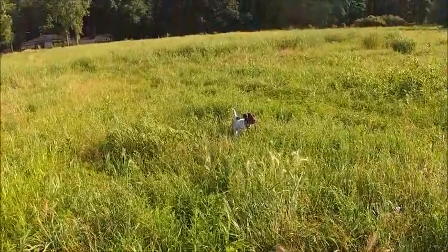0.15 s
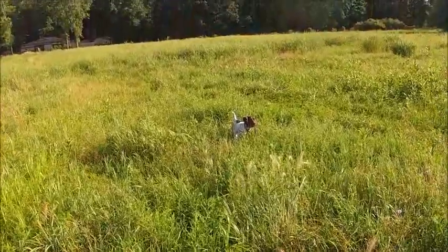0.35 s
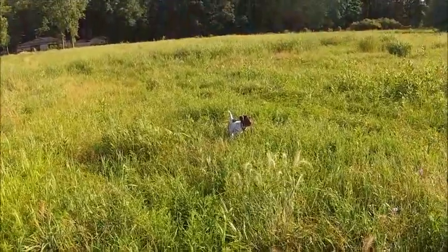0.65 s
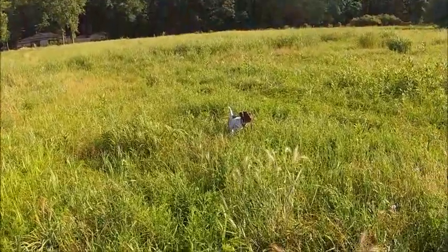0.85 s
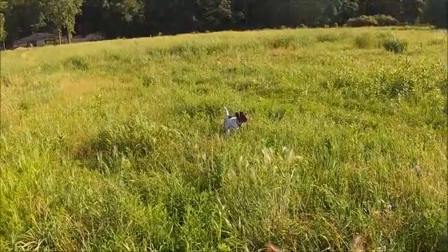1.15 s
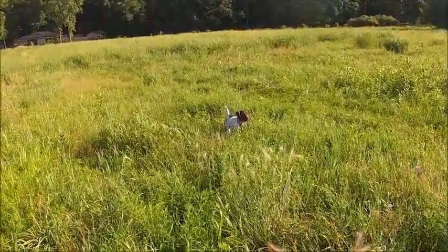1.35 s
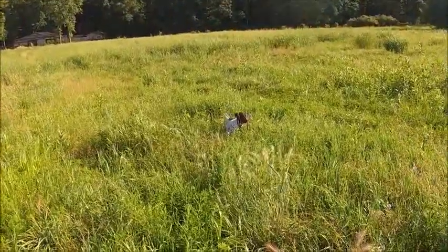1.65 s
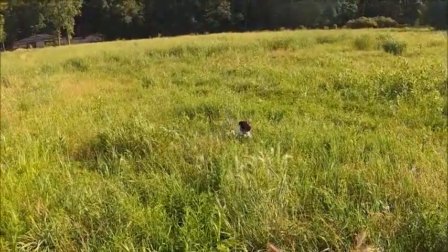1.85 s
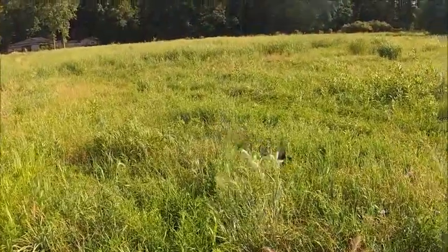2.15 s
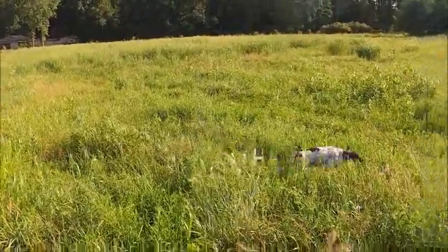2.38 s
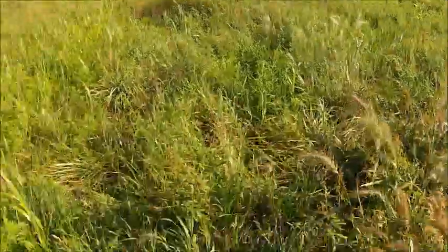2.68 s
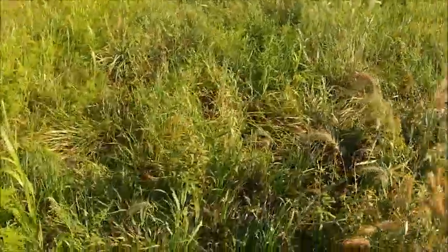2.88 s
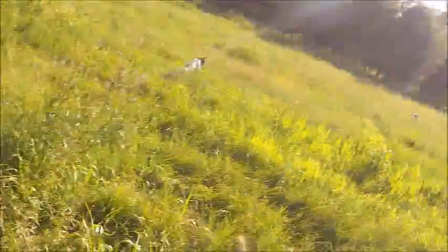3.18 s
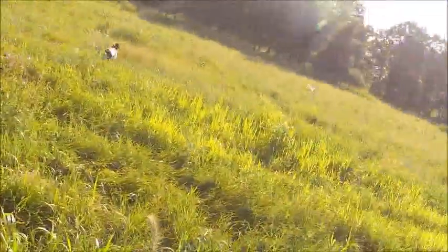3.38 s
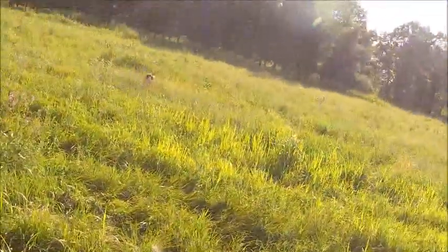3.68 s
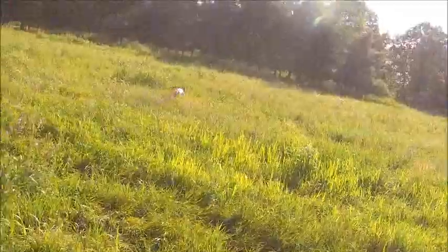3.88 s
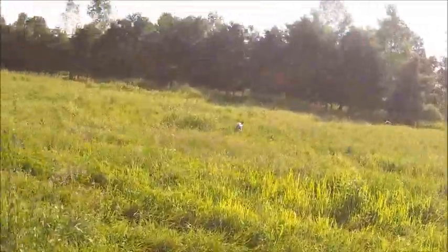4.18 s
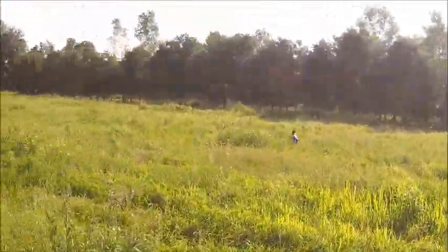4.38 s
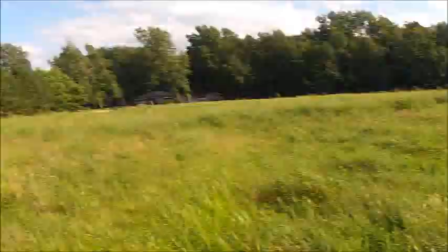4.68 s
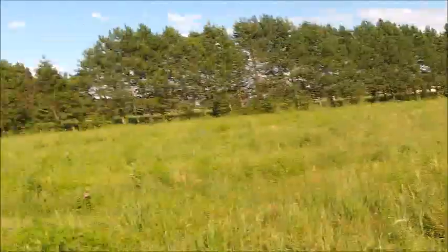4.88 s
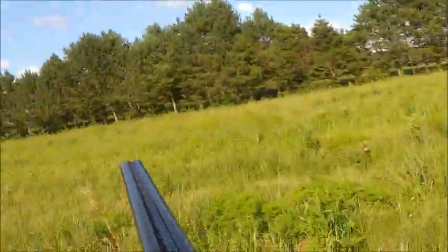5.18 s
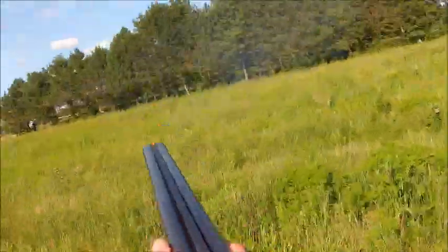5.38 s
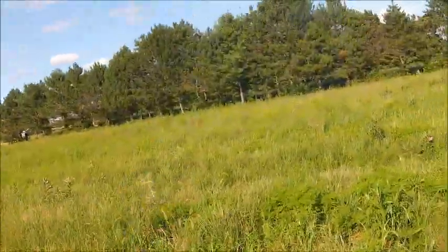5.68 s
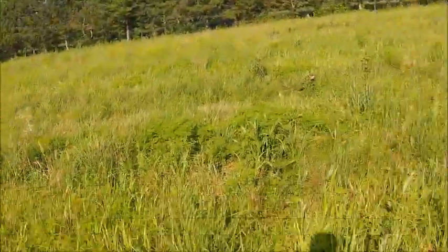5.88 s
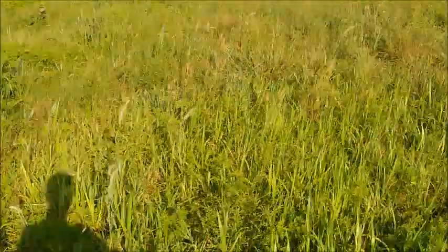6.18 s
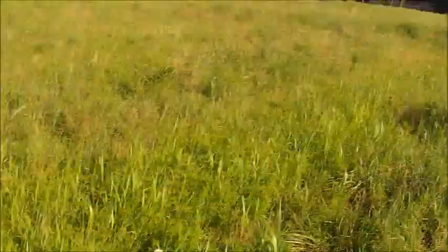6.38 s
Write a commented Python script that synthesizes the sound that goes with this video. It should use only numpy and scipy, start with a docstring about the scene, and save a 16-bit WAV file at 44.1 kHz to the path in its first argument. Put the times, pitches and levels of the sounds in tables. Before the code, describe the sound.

Heard from a hunter's head outdoors: soft air and faint insect flutter, a tiny falling whistle, then brisk rustling, small creaks and brittle cracks through tall grass. Low wind gusts rumble on the microphone while gear pings and steel clicks. A single violent gunshot distorts, answered at once by strong tree-line echoes and a duller rolling tail, with a couple of small clicks afterward.

```python
"""An insect buzzes over an open field, then grass swishes, squeaks and snaps as a hunter walks through.
Wind buffets the head-worn recorder as the hunter turns; a raised shotgun clicks, fires once and the shot rolls
back from the trees. Filtered noise makes air, wind, footfall rumble, blast and returns, random grains and
impulses make the grass, snaps and clicks, and swept sines make insect, whistle, squeaks and pings.
The recorder clips its input, samples slowly and holds each value, which mirrors the sound into a gritty treble."""
import sys
import numpy as np
from scipy import signal
from scipy.fft import rfft, irfft, next_fast_len
from scipy.io import wavfile
from scipy.ndimage import uniform_filter1d

SR = 44100
rng = np.random.default_rng(int(sys.argv[2]) if len(sys.argv) > 2 else 0)


def dump(signal):
    """Clip the signal to [-1, 1] and save it as 16-bit WAV at the path in sys.argv[1]."""
    limited = np.clip(np.atleast_2d(signal).T, -1, 1)
    pcm = np.round(limited * 32767).astype(np.int16)
    wavfile.write(sys.argv[1], SR, pcm)


N = 288414

# Grass and clothing in motion. Each row: time in seconds, level in dB before the mix of hiss and crackle.
RUSTLE_MOTION = [(1.55, -65), (1.98, -55), (2.25, -50), (2.58, -49), (2.87, -55.5), (3.5, -54.5),
                 (3.72, -59.5), (3.95, -57), (4.3, -57.5), (4.79, -56), (5.33, -64)]
# Clothing rubbing near the microphone. Each row: time in seconds, level in dB before the rubbing gain.
CLOTH_MOTION = [(2.0, -43.5), (2.288, -39), (2.534, -44.5), (2.644, -45), (2.954, -50.5), (3.162, -53),
                (3.3, -53)]
# Bright tone of a crack or click. Each row: frequency in Hz, relative level in dB.
CRACK_TONE = [(600, -25), (1000, -2.5), (1250, -5.5), (1500, -7.5), (1750, -5), (2700, 3.5), (3300, 2.5),
              (4000, -8), (5500, -4.5)]
# Dull tone of a knock. Each row: frequency in Hz, relative level in dB.
KNOCK_TONE = [(60, -7.5), (230, 1.5), (400, -1), (600, -0.5), (800, -6.5), (1100, -24), (3000, -63.5)]
WALK_START_S, WALK_END_S = 2.02, 3.25  # twigs and creaks are spread over this stretch


def from_db(db):
    """Decibels to gain."""
    return 10 ** (np.asarray(db) / 20)


def rms_one(x):
    """Scale to unit rms."""
    return x / np.sqrt(np.mean(x ** 2) + 1e-20)


def seconds():
    """Time of every sample."""
    return np.arange(N) / SR


def level_curve(rows):
    """Gain that follows (seconds, dB) points and fades to nothing just outside them."""
    s, db = np.transpose(rows)
    edges = [s[0] - 0.015, s[0], s[-1], s[-1] + 0.015]
    return from_db(np.interp(seconds(), s, db)) * np.interp(seconds(), edges, [0, 1, 1, 0])


def coloured(x, spectrum):
    """Causal (minimum-phase) filter with the given spectrum and unit power gain."""
    size = 2 * next_fast_len(N // 2 + SR // 8)
    hz, db = np.transpose(spectrum)
    octave = np.log2(np.maximum(np.arange(size // 2 + 1) * SR / size, 1))
    below = np.maximum(np.log2(hz[0]) - octave, 0)
    above = np.maximum(octave - np.log2(hz[-1]), 0)
    # beyond the listed frequencies the level falls 12 dB per octave
    gain = rms_one(from_db(np.interp(octave, np.log2(hz), db) - 12 * (below + above)))
    # folding the cepstrum onto positive time gives the minimum phase
    cepstrum = irfft(np.log(gain))
    cepstrum[1:size // 2] *= 2
    cepstrum[size // 2 + 1:] = 0
    return irfft(rfft(x, size) * np.exp(rfft(cepstrum)))[:N]


def drift(knots_per_s):
    """Slow random wander with rms 1: straight lines between random knots."""
    knots = rng.standard_normal(N // 20)
    return rms_one(np.interp(seconds() * knots_per_s, np.arange(len(knots)), knots))


def evened(x, span_s):
    """Hold the rms near 1 over the given span, leaving finer detail."""
    power = uniform_filter1d(x ** 2, max(int(span_s * SR), 2))
    return x / np.sqrt(np.maximum(power, 1e-9))


def noise(spectrum):
    """Steady coloured noise, rms about 1."""
    return coloured(rng.standard_normal(N), spectrum)


def grains(per_s, spread_db):
    """Random tiny impulses of varying size, rms 1."""
    sizes = from_db(spread_db * np.minimum(rng.exponential(1, N), 4))
    signs = rng.choice([-1, 1], N)
    return rms_one(sizes * signs * (rng.random(N) < per_s / SR))


def swells(rows):
    """Envelope of bursts that rise to each listed time and then die away; their powers add."""
    power = np.zeros(N)
    for peak_s, db, rise, decay in rows:
        age = seconds() - peak_s
        fall = np.where(age < 0, (age / rise) ** 2, age / decay)
        power += (from_db(db) * np.exp(-np.minimum(fall, 20))) ** 2
    return np.sqrt(power)


def contacts(rows, scatter, decay_s):
    """Force of each click, an impulse and a brief scatter of smaller ones: (sharp part, dull part)."""
    sharp, dull = np.zeros(N), np.zeros(N)
    age = np.arange(SR // 20) / SR
    for s, db, knock_db in rows:
        burst = rng.standard_normal(len(age)) * np.exp(-age / decay_s)
        burst *= scatter / np.linalg.norm(burst)
        burst[0] += 1
        burst /= np.linalg.norm(burst)
        at = round(s * SR)
        sharp[at:at + len(age)] += from_db(db) * burst
        dull[at:at + len(age)] += from_db(db + knock_db) * burst
    return sharp, dull


def crack_and_knock(sharp, dull, crack_db, knock_db):
    """The sharp force excites a bright crack, the dull force a low knock."""
    crack = from_db(crack_db) * coloured(sharp, CRACK_TONE)
    return crack + from_db(knock_db) * coloured(dull, KNOCK_TONE)


def still_air(level_db):
    """The quiet bed of the field: steady coloured noise."""
    # Tone of the still air. Each row: frequency in Hz, relative level in dB per Hz.
    air_tone = [(15, -34.5), (25, -6.5), (72, -5.5), (152, -15), (183, -19.5), (355, -11.5), (456, -15.5),
                (560, -17), (672, -15.5), (789, -26), (1400, -32), (2420, -27.5), (4280, -36),
                (5900, -31.5), (7670, -71.5)]
    return from_db(level_db) * noise(air_tone)


def whistle():
    """One faint pure tone, perhaps a bird, that holds its note and then drops."""
    # Path of the whistle. Each row: time in seconds, pitch in Hz, level in dB.
    whistle_path = [(1.605, 3400, -63), (1.63, 3470, -59), (1.69, 3300, -56), (1.705, 2850, -62),
                    (1.728, 2250, -66)]
    s, hz, db = np.transpose(whistle_path)
    pitch = np.interp(seconds(), s, hz)
    return level_curve(np.column_stack([s, db])) * np.sin(2 * np.pi * np.cumsum(pitch) / SR)


def insect(level_db, flicker_db, start_hz, fall_hz, stroke_share):
    """Each wing stroke gives a short chirp that falls in pitch; the buzz stops as the hunter moves off."""
    # Pace of the wings. Each row: time in seconds, strokes per second.
    wing_pace = [(0, 42), (.45, 81), (.66, 43), (1.2, 28), (1.33, 56), (1.7, 72)]
    s, pace = np.transpose(wing_pace)
    strokes = np.cumsum(np.interp(seconds(), s, pace)) / SR
    along = np.minimum(strokes % 1 / stroke_share, 1)  # the rest of each stroke is silent
    tone = np.sin(2 * np.pi * np.cumsum(start_hz - fall_hz * along) / SR)
    level = from_db(level_db + flicker_db * drift(knots_per_s=40))
    fade_out = np.clip((s[-1] - seconds()) * 10, 0, 1)
    return level * np.sin(np.pi * along) * tone * fade_out


def wind_and_thumps(rumble_db, lumpy_db):
    """Lumpy low pressure on the port: each gust or thump rises, holds, drops and leaves a weak wake."""
    # Gusts from the breeze and the turning head, and at 2.093 s the low rumble of walking thumps.
    # Each row: start of the hold in seconds, its length in seconds, level in dB before the rumble gain.
    rumble_list = [(0.633, 0.14, -55), (2.093, 0.74, -53.5), (3.337, 0.067, -23), (3.539, 0.95, -31),
                   (3.706, 0.52, -29), (4.012, 0.11, -22), (4.881, 0.21, -30.5), (5.101, 0.19, -37),
                   (5.57, 0.55, -35), (6.281, 0.058, -37.5)]
    # Tone of the buffeting. Each row: frequency in Hz, relative level in dB.
    wind_tone = [(12, -38), (20, -2), (85, 2.5), (187, -2), (236, -6), (276, -6.5), (307, -11),
                 (376, -15.5), (536, -22), (800, -38.5), (1040, -66)]
    rise_s, decay_s = 0.021, 0.012
    wake_db, wake_decay_s = -13.5, 0.25
    power = from_db(-61) ** 2  # steady breeze underneath
    for s, length, db in rumble_list:
        early = np.maximum(s - seconds(), 0)
        late = np.maximum(seconds() - s - length, 0)
        rise = np.exp(-np.minimum(early / rise_s, 20))
        wake = from_db(wake_db) * np.exp(-late / wake_decay_s)
        fall = np.maximum(np.exp(-late / decay_s), wake)
        power = power + (from_db(db) * rise * fall) ** 2
    lumps = from_db(rumble_db + lumpy_db * drift(knots_per_s=50))
    return lumps * np.sqrt(power) * evened(noise(wind_tone), 0.058)


def grass(crackle_db, hiss_db, patchy_db, rubbing_db):
    """Blades rub with a hiss and flick past one another in clumps of grains; cloth rubs below."""
    # Brief harder brushes against the stalks, and at 4.112 s the rattle that follows the gun's loudest click.
    # Each row: peak in seconds, level in dB before hiss and crackle.
    brush_and_rattle_list = [(2.55, -52), (3.15, -49.5), (3.204, -45), (4.112, -36.5)]
    # Sweeps through the stalks. Each row: peak in seconds, level in dB, rise in seconds, decay in seconds.
    swish_list = [(1.652, -41, 0.004, 0.014), (1.779, -35.5, 0.011, 0.078), (1.814, -32.5, 0.0037, 0.03),
                  (1.931, -32.5, 0.0073, 0.013), (1.965, -44.5, 0.018, 0.013), (2.275, -42.5, 0.015, 0.014),
                  (2.395, -45, 0.024, 0.016), (2.578, -44.5, 0.015, 0.016), (2.732, -40.5, 0.0056, 0.0099)]
    # Tones of rustle, rubbing cloth and swish. Each row: frequency in Hz, relative level in dB.
    rustle_tone = [(300, -3), (600, 6.5), (950, -4.5), (1250, -6), (1750, -9.5), (2300, -1), (3100, -3.5),
                   (4300, -9), (5500, -13.5)]
    rubbing_tone = [(100, -0.5), (220, 0.5), (400, -2), (580, -2.5), (800, -27.5), (1300, -21)]
    swish_tone = [(88, -46), (150, -21.5), (299, -7.5), (375, -5.5), (480, -18), (559, 0), (641, -8.5),
                  (1060, -28), (2250, -10), (4020, -15), (4610, -21), (5290, -12.5), (5800, -18),
                  (7540, -56), (12800, -120)]
    bursts = swells([(s, db, 0.015, 0.036) for s, db in brush_and_rattle_list])
    motion = np.hypot(level_curve(RUSTLE_MOTION), bursts)
    vigour = np.minimum(motion / from_db(-51.5), 1)  # weaker motion thins the crackle to a hiss
    clumps = from_db(patchy_db * np.sqrt(vigour) * drift(knots_per_s=66))

    hiss = from_db(hiss_db) * rng.standard_normal(N)
    crackle = from_db(crackle_db) * vigour * grains(per_s=540, spread_db=4.0)
    rustle = coloured((hiss + crackle) * motion * clumps, rustle_tone)

    cloth = grains(per_s=1000, spread_db=5) * level_curve(CLOTH_MOTION) * clumps
    rubbing = from_db(rubbing_db) * coloured(cloth, rubbing_tone)

    sweeps = evened(grains(per_s=5000, spread_db=-0.5), 0.0024) * swells(swish_list)
    return rustle + rubbing + coloured(sweeps, swish_tone)


def creaks(per_s, length_s, centre_hz, spread_octaves, level_db):
    """Thick stems creak low at uneven intervals, following the cloth: rows of (s, length s, Hz, dB)."""
    chance = rng.standard_normal((80, 3))
    s = WALK_START_S + (np.arange(len(chance)) + 0.5 * chance[:, 0]) / per_s
    hz = centre_hz * 2 ** (spread_octaves * np.clip(chance[:, 1], -2, 2))
    db = np.interp(s, *np.transpose(CLOTH_MOTION)) + level_db + 2 * chance[:, 2]
    return np.column_stack([s, np.full(len(s), length_s), hz, db])[s < WALK_END_S].tolist()


def squeaks(waver, rough_db, sag):
    """Stick and slip between stalks: brief sagging tones, unsteady in pitch and strength."""
    # Rubbing stalks. Each row: start in seconds, length in seconds, starting pitch in Hz before the waver,
    # level in dB before the flutter.
    squeak_list = [(2.282, .031, 1160, -44), (2.394, 0.028, 964, -43.5), (3.117, 0.025, 3100, -50),
                   (3.149, 0.0089, 3120, -38.5)]
    stems = creaks(per_s=45, length_s=0.013, centre_hz=577, spread_octaves=0.402, level_db=-1.0)
    out = np.zeros(N)
    wobble = 1 + waver * drift(knots_per_s=300)
    flutter = from_db(rough_db * drift(knots_per_s=200))
    for s, length, start_hz, db in list(squeak_list) + stems:
        span = slice(round(s * SR), round((s + length) * SR))
        along = np.linspace(0, 1, span.stop - span.start)
        hz = start_hz * (1 - sag * along) * wobble[span]
        swell = from_db(db) * np.sin(np.pi * along ** 0.8) * flutter[span]
        out[span] += swell * np.sin(2 * np.pi * np.cumsum(hz) / SR)
    return out


def pings(ring_hz):
    """A small metal ring on the gear sounds one slightly unsteady note each time it is touched."""
    # Touches of the ring. Each row: peak in seconds, level in dB.
    ping_list = [(3.083, -52), (3.229, -39.5), (3.899, -42.5), (4.17, -45), (4.289, -51), (4.33, -56)]
    level = swells([(s, db, 0.001, 0.012) for s, db in ping_list])
    hz = ring_hz * (1 + 0.014 * drift(knots_per_s=250))
    return level * np.sin(2 * np.pi * np.cumsum(hz) / SR)


def twigs(per_s, level_db, spread_db, knock_db):
    """Lesser stalks break at uneven intervals, following the rustle: rows of (s, dB, relative knock dB)."""
    chance = rng.standard_normal((64, 3))
    s = WALK_START_S + (np.arange(len(chance)) + 0.5 * chance[:, 0]) / per_s
    db = np.interp(s, *np.transpose(RUSTLE_MOTION)) + level_db + spread_db * chance[:, 1]
    knocks = knock_db + spread_db * chance[:, 2]
    return np.column_stack([s, db, knocks])[s < WALK_END_S].tolist()


def snaps(crack_db, knock_db):
    """Dry stalks crack and knock on the gear: bursts of force through a bright and a dull filter."""
    # The loudest stalks. Each row: time in seconds, level in dB, knock in dB relative to it,
    # both before the crack and knock gains.
    snap_list = [(1.2585, -51.5, 7), (2.0657, -36, 5), (2.0864, -27.5, 1.5), (2.1428, -32.5, -7),
                 (2.3618, -19.5, -6), (2.4758, -22, -8.5), (2.5457, -30, -14), (2.592, -23.5, 1),
                 (2.7021, -28.5, -27), (2.7104, -18.5, -5), (2.9552, -38, -3), (3.016, -32.5, -11),
                 (3.1792, -34.5, -2.5), (3.2017, -26, -6), (3.2199, -34, -13), (3.2278, -24.5, -11),
                 (4.6286, -33.5, -16)]
    small = twigs(per_s=26, level_db=9.5, spread_db=2.5, knock_db=-6)
    sharp, dull = contacts(list(snap_list) + small, scatter=1.0, decay_s=0.003)
    return crack_and_knock(sharp, dull, crack_db, knock_db)


def gun_handling(ring_db, crack_db, knock_db):
    """Steel parts click and ring briefly as decaying sine resonances; the stock knocks."""
    # Handling of the gun. Each row: time in seconds, level in dB, knock in dB relative to it,
    # both before the gains for ring, crack and knock.
    click_list = [(3.8027, -28.5, -16), (4.0973, -13.5, -9), (4.1148, -28, -12), (4.9445, -39, -24),
                  (4.9575, -46, 0), (5.155, -47, -18), (5.3103, -40, -26), (5.9974, -30, -16),
                  (6.1706, -37.5, -5)]
    # Resonances of the steel. Each row: frequency in Hz, level in dB before the ring gain, t60 in seconds.
    steel_modes = [(480, -9, 0.048), (674, -6.5, 0.02), (720, -33, 0.032), (1176, -12, 0.028),
                   (1550, -3, 0.016), (2030, -4, 0.012), (2400, -34, 0.039), (2560, 1, 0.0024),
                   (3040, -16, 0.0049), (3200, -22, 0.011), (4120, -8, 0.018), (4700, -8, 0.018)]
    sharp, dull = contacts(click_list, scatter=1.0, decay_s=0.004)
    out = crack_and_knock(sharp, dull, crack_db, knock_db)
    for k, (hz, db, t60) in enumerate(steel_modes):
        radius = from_db(-60 / (t60 * SR))
        angle = 2 * np.pi * hz / SR
        poles = [1, -2 * radius * np.cos(angle), radius ** 2]
        ring = signal.lfilter([0, np.sin(angle)], poles, sharp + 1e-18)  # the offset avoids slow tiny numbers
        out += (-1) ** k * from_db(db + ring_db) * ring
    return out


def forest(body_db, top_db, echo_db):
    """Countless trunks each return a small copy of the shot, later ones duller; tree lines return strong ones."""
    # Stands of trees that scatter the shot back, before the body and top gains, and the bright hiss returned
    # by the leaves, before the top gain. Each row: peak in seconds, level in dB, rise and decay in seconds.
    stand_list = [(5.637, -13, .011, 0.068), (5.775, -26, 0.05, 0.014), (5.985, -28, 0.034, .06),
                  (6.045, -31.5, 0.029, 0.033), (6.33, -37.5, 0.0092, 0.036)]
    leaf_list = [(5.72, -37.5, 0.19, 0.27)]
    # Distinct returns from the tree lines. Each row: peak in seconds, level in dB before the echo gain.
    echo_list = [(5.630, -19.5), (5.64, -9.5), (5.668, -7.5), (5.693, -27), (5.753, -15), (5.779, -24),
                 (5.960, -27.5), (5.991, -21), (6.439, -33.5)]
    # Tones of the low roll, the bright roll and the echoes. Each row: frequency in Hz, relative level in dB.
    body_tone = [(80, -12), (200, -7), (310, -19.5), (420, -3.5), (630, 1.5), (760, -8), (980, -18.5),
                 (1500, -22.5), (3000, -68)]
    top_tone = [(700, -6.5), (1100, -10), (1450, -12), (2000, 2.5), (2800, 2), (3600, -6.5), (5000, -13.5),
                (5800, -15)]
    echo_tone = [(60, -9.5), (225, 3), (320, -24.5), (430, 5.5), (540, 12), (760, -4), (1000, -27),
                 (1170, -12), (1450, -25), (2000, -8), (2400, -27), (2780, -9.5), (3800, -35), (5800, -35)]
    answer_s = 5.375
    near_grass = (answer_s, -38.5, 0.01, 0.17)
    far_forest = (answer_s, -42.5, 0.01, 11)  # lasting roll
    level = swells([near_grass, far_forest] + list(stand_list))
    treble = from_db(-10 - 4.5 * np.maximum(seconds() - answer_s, 0))  # the air dulls later returns
    trunks = grains(per_s=5000, spread_db=2.5)
    body = from_db(body_db) * level * evened(coloured(trunks, body_tone), 0.027)
    top_level = np.hypot(level * treble, swells(leaf_list))
    top = from_db(top_db) * top_level * evened(coloured(trunks, top_tone), 0.067)
    echo_level = swells([(s, db, 0.0018, 0.0073) for s, db in echo_list])
    echoes = from_db(echo_db) * echo_level * evened(noise(echo_tone), 0.0061)
    return body + top + echoes


def shot(boom_db, crack_db, split_hz):
    """A few milliseconds of violent pressure, driven past full scale: a low boom and a bright crack."""
    # Muzzle blast and its bounce off the ground. Each row: peak in seconds, level in dB before the
    # boom and crack gains, rise in seconds, decay in seconds.
    blast_list = [(5.3472, -8.5, 0.0019, .002), (5.3497, 8.5, 0.0018, 0.0037),
                  (5.3535, -0.5, 0.0025, 0.0023), (5.3605, -13, 0.00085, 0.0014),
                  (5.368, -26.5, 0.004, 0.022)]
    # Tone of the blast. Each row: frequency in Hz, relative level in dB.
    blast_tone = [(30, -15), (100, 7.5), (290, 8.5), (500, 2.5), (620, 4), (800, 3.5), (1000, -17),
                  (1170, -5.5), (1400, -18), (1900, -4), (2750, -1.5), (3400, -18), (3750, -1.5),
                  (4100, -20.5), (5800, -9)]
    pressure = noise(blast_tone)
    boom = signal.sosfilt(signal.butter(4, split_hz, "low", fs=SR, output="sos"), pressure)
    crack = signal.sosfilt(signal.butter(4, split_hz, "high", fs=SR, output="sos"), pressure)
    boom = from_db(boom_db) * evened(boom, 0.0078)
    crack = from_db(crack_db) * evened(crack, 0.0014)
    return (boom + crack) * swells(blast_list)


def scene():
    """Everything heard at the hunter's head, before the recorder."""
    field = still_air(level_db=-57) + whistle() + wind_and_thumps(rumble_db=-0.5, lumpy_db=3.22)
    field += insect(level_db=-68.5, flicker_db=1.3, start_hz=5880, fall_hz=560, stroke_share=0.6)
    walk = grass(crackle_db=-1.0, hiss_db=-2.5, patchy_db=3.0, rubbing_db=-3.5)
    walk += squeaks(waver=0.036, rough_db=4.0, sag=0.036)  # waver and sag are shares of the pitch
    walk += pings(ring_hz=4070) + snaps(crack_db=13.5, knock_db=19.0)
    gun = gun_handling(ring_db=-4.0, crack_db=13.5, knock_db=26.0)
    gun += forest(body_db=0, top_db=1.4, echo_db=0.4)
    gun += shot(boom_db=-3, crack_db=-6.0, split_hz=1000)
    return (field + walk + gun)[None]


def record(dry):
    """The input overloads and is sampled slowly; holding each sample mirrors the spectrum upward."""
    recorder_hz, hold = 12000, 4  # sampling rate, and copies of each sample
    band = signal.sosfilt(signal.butter(10, 5610, fs=SR, output="sos"), dry)
    samples = np.clip(signal.resample_poly(band, recorder_hz, SR, axis=1), -0.93, 0.93)
    steps = np.repeat(samples, hold, axis=1)
    held = signal.resample_poly(steps, SR, hold * recorder_hz, axis=1)[:, :N]
    # steep cutoff at 15.4 kHz
    return signal.sosfilt(signal.ellip(10, 0.1, 70, 15400, fs=SR, output="sos"), held)


dry = scene()
out = record(dry)
dump(out)
```